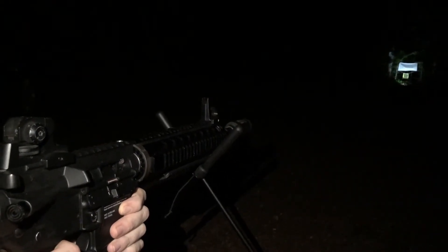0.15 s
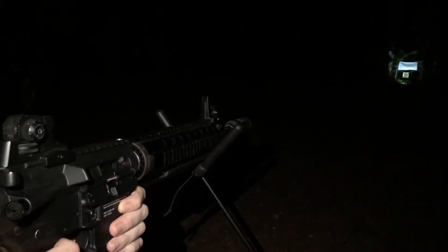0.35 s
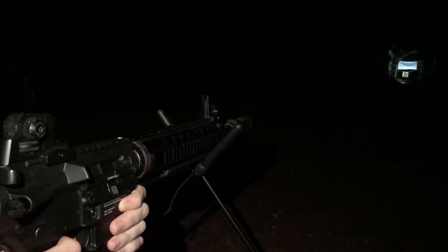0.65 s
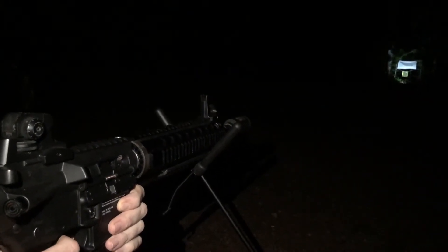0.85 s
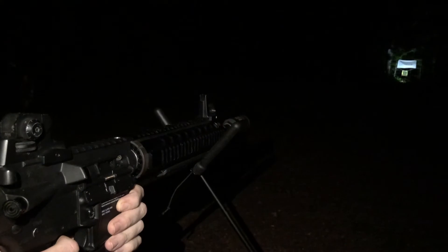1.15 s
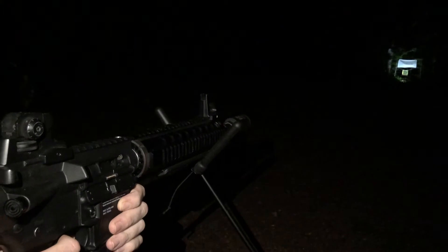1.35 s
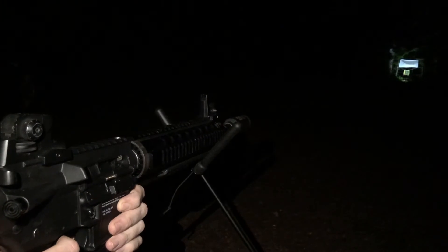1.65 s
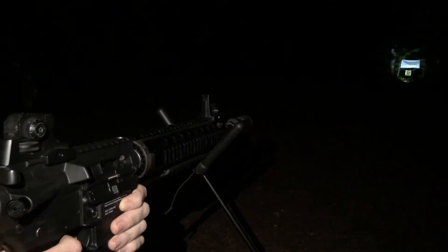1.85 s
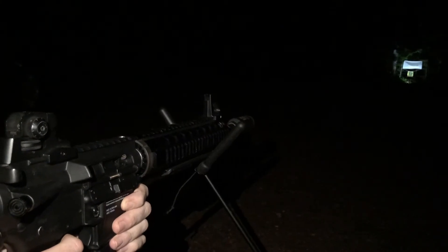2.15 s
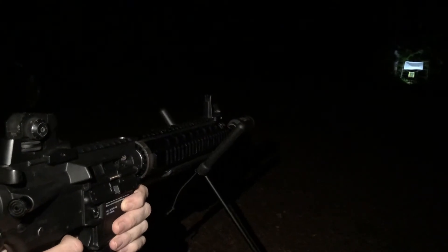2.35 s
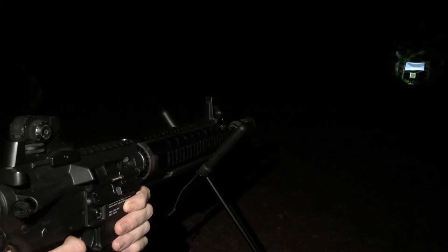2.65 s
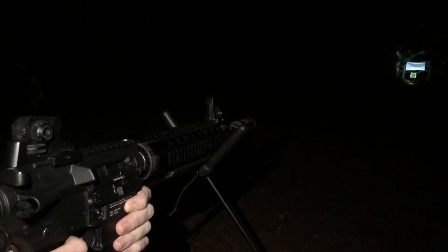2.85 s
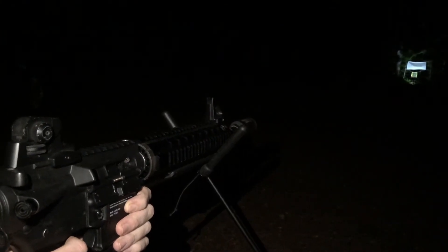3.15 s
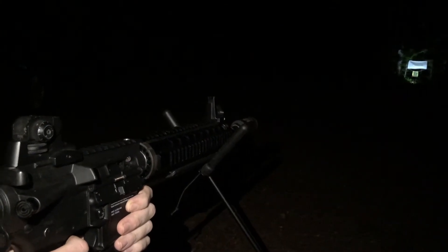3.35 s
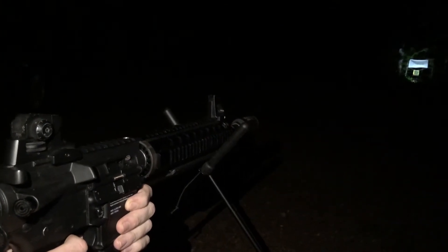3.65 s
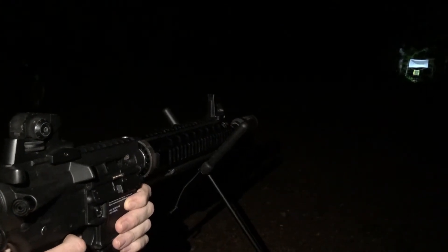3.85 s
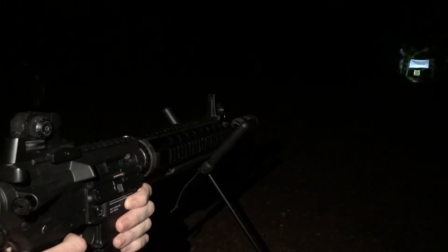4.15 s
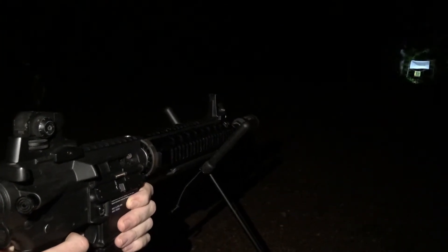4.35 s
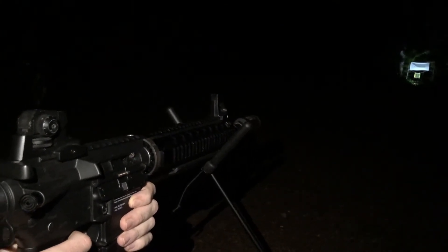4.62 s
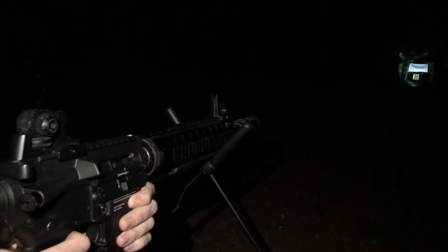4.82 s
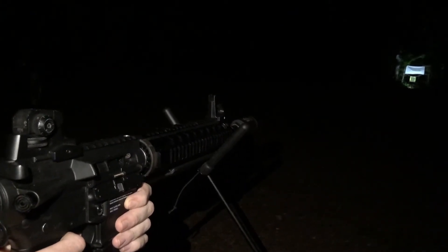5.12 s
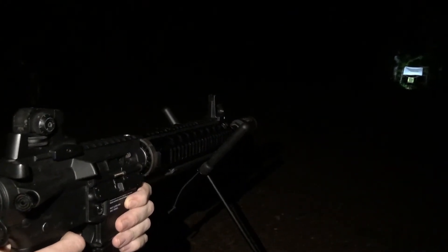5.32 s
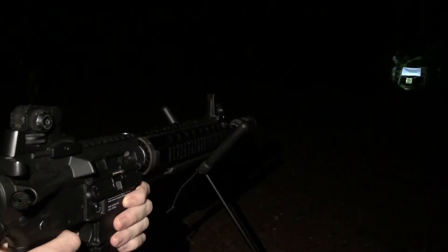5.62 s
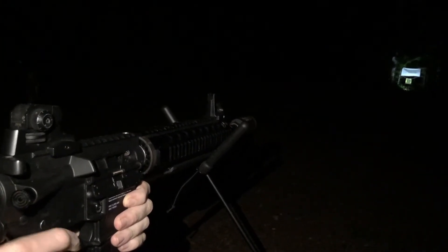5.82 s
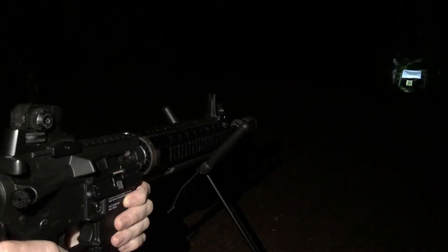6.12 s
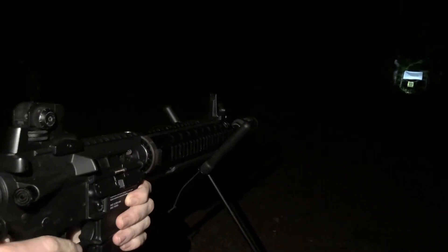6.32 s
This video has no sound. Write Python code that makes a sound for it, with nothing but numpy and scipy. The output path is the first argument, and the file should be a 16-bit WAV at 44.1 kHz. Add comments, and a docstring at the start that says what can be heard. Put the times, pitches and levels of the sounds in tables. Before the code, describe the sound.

At night outdoors, an earlier shot's echo fades, a mechanism clicks, then an airsoft rifle pops loudly close by, echoes off trees and clicks again.

```python
"""The echo of an earlier shot dies away over a soft hiss and low hum, outdoors at night; its pellet smacks a target.
Far crickets chirp (swelling noise), and a spring airsoft rifle fires close by at 4.8 s: sear, piston, slam, rebounds.
Each of these contacts is a bright noise burst plus the ringing modes of the body.
The pop is a filtered impulse, scattered back from the trees as fading noise, during which the pellet hits far away.
Small parts click, once before this shot and otherwise after it: noise bursts through resonances, with body knocks."""
import sys
import numpy as np
from scipy import signal
from scipy.fft import rfft, irfft, next_fast_len
from scipy.io import wavfile
from scipy.ndimage import uniform_filter1d, map_coordinates

SR = 44100
rng = np.random.default_rng(int(sys.argv[2]) if len(sys.argv) > 2 else 0)


def wav_out(sig):
    """Save sig, one row per channel (or a flat mono array), as 16-bit PCM at SR to the path in sys.argv[1]."""
    wavfile.write(sys.argv[1], SR, np.round(np.clip(np.atleast_2d(sig).T, -1, 1) * 32767).astype(np.int16))


N = 285768  # length of the scene in samples
T = np.arange(N) / SR  # time in seconds

# The shots. Each row: trigger time in seconds, strength of the pellet's hit in relative dB.
SHOTS = [(-.1525, -2), (4.8177, 0)]
# Bright spectrum of metal parts snapping together. Each row: frequency in Hz, relative level in dB per Hz.
SNAP_SPECTRUM = [(200, -15), (1000, -12.5), (2200, -7.5), (3200, 2.5), (4200, -6), (6500, 2), (9000, 0),
                 (10500, -3), (12500, -1.5), (16000, -8.5)]


def amp(db):
    """Turn decibels into a gain."""
    return 10 ** (np.asarray(db) / 20)


def unit(x):
    """Scale x to rms 1."""
    return x / np.sqrt(np.mean(np.abs(x) ** 2) + 1e-20)


def add(track, s, x):
    """Mix x into the track from time s in seconds; parts outside the track are cut off."""
    start = round(s * SR)
    x = x[max(-start, 0):N - start]
    track[max(start, 0):][:len(x)] += x


def filtered(x, response):
    """Multiply the spectrum of x by a complex response to frequency in Hz."""
    size = next_fast_len(len(x) + SR // 2)  # spare room, so that the end does not wrap round to the start
    spectrum = rfft(x, size) * response(np.fft.rfftfreq(size, 1 / SR))
    return irfft(spectrum, size)[:len(x)]


def colour(x, points):
    """Shape the spectrum of x through (Hz, dB) points with a filter of unit power that never sounds early."""
    size = 4096
    hz, db = np.transpose(points)
    log_hz = np.log(np.fft.rfftfreq(size, 1 / SR) + 1)
    gain = unit(amp(np.interp(log_hz, np.log(hz), db)))
    # Folding the cepstrum (spectrum of the log gain) forward in time gives the minimum-phase filter.
    cepstrum = irfft(np.log(gain))
    cepstrum[1:size // 2] *= 2
    cepstrum[size // 2 + 1:] = 0
    impulse_response = irfft(np.exp(rfft(cepstrum)))
    return signal.fftconvolve(x, impulse_response)[:len(x)]


def resonate(x, hz, width):
    """Pass x through one resonance of a given width in Hz, at unit power gain."""
    return filtered(x, lambda f: unit(1j * f * width / (hz * hz - f * f + 1j * f * width)))


def burst(t60):
    """One second of noise that falls 60 dB in t60 seconds; its energy is the same at every draw."""
    fade = amp(-60 * T[:SR] / t60)
    return unit(rng.standard_normal(SR) * fade) * np.sqrt(np.mean(fade ** 2))


def wobble(rate):
    """A smooth random curve through a given number of random points a second."""
    return map_coordinates(rng.standard_normal(int(N * rate / SR) + 4), [T * rate])


def patchy(x, depth_db):
    """Give x small random patches of gain in time and frequency, at rms 1."""
    z = signal.stft(x, nperseg=1024)[2]
    field = uniform_filter1d(rng.standard_normal(z.shape), size=3, axis=0)  # across frequency
    field = uniform_filter1d(field, size=9, axis=1)  # across time
    return unit(signal.istft(z * amp(depth_db * unit(field)), nperseg=1024)[1][:len(x)])


def tone(hz, width):
    """A tone of rms 1 whose wandering phase spreads it over a width in Hz."""
    drift = np.cumsum(rng.standard_normal(N)) * np.sqrt(2 * np.pi * abs(width) / SR)
    return np.sqrt(2) * np.sin(2 * np.pi * hz * T + drift)


def night(hiss_db=2, fizz_db=-13.0, fizz_swell=2, flutter_db=0.73):
    """A soft, fluttering hiss that brightens as it swells, a low rumble and faint steady tones."""
    # Slow course of the hiss. Each row: time in seconds, level in dB before the offsets hiss_db and fizz_db.
    air_level = [(0.0, -58.5), (1.12, -58), (1.16, -57.0), (1.92, -56), (2.28, -56.5), (2.4, -59),
                 (2.54, -54.5), (2.96, -55), (3.0, -56), (3.64, -55.5), (3.74, -59.0), (3.82, -55),
                 (4.18, -55.5), (4.22, -58.5), (4.54, -53.0), (4.76, -56), (5.56, -58.5), (5.64, -56),
                 (6.04, -56.5), (6.46, -52.5)]
    # Main part of the hiss. Each row: frequency in Hz, relative level in dB per Hz.
    hiss_spectrum = [(300, -11.5), (500, -6.5), (760, -6), (1000, -12.5), (1400, -5), (1650, -7), (2050, 1),
                     (2650, -2), (3100, 2.5), (3700, -1), (4500, 3), (5700, -1), (6900, -19), (9000, -30)]
    # Top treble of the hiss. Each row: frequency in Hz, relative level in dB per Hz.
    fizz_spectrum = [(5000, -36), (8500, -27), (11000, -3), (14000, 1), (15600, 7.5), (16000, -8)]
    # Low rumble. Each row: frequency in Hz, relative level in dB per Hz.
    rumble_spectrum = [(20, -41), (45, 0), (75, -12), (100, 2.5), (140, 0.5), (230, 0), (290, -8.5),
                       (380, -6), (500, -20), (1200, -34.5)]
    # Slow course of the rumble. Each row: time in seconds, level in dB.
    rumble_level = [(0, -63), (1.3, -60.5), (3.9, -58.5), (5.2, -61), (6.48, -59.5)]
    # Faint steady tones. Each row: frequency in Hz, width in Hz, rms level in dB.
    hum_tones = [(54, .1, -67), (110, 1.2, -81), (154.7, 2, -71.5), (221.3, 2.63, -73), (832, 7.8, -78.5),
                 (2441, 40.6, -67.5)]

    level = np.interp(T, *np.transpose(air_level)) + flutter_db * wobble(rate=16)
    hiss = amp(hiss_db + level) * colour(patchy(rng.standard_normal(N), depth_db=2), hiss_spectrum)
    # In dB, the top treble swings fizz_swell times as far as the rest of the hiss.
    fizz_level = fizz_db + level.mean() + fizz_swell * (level - level.mean())
    fizz = amp(fizz_level) * colour(rng.standard_normal(N), fizz_spectrum)
    rumble_gain = amp(np.interp(T, *np.transpose(rumble_level)))
    rumble = rumble_gain * colour(rng.standard_normal(N), rumble_spectrum)
    hum = sum(amp(db) * tone(hz, width) for hz, width, db in hum_tones)
    return hiss + fizz + rumble + hum


def trees(t):
    """Level in dB of the scatter: it builds up, weakens with distance and fades after the last trunks."""
    nearest_s, farthest_s = 0.088, 0.55  # round trips to the nearest and farthest trunks
    first_echo_db, spread_db_per_decade = -39, 14  # the second is the loss with distance
    build_db_per_s, fade_db_per_s = 102, 134  # before the nearest trunks, after the farthest
    spread = spread_db_per_decade * np.log10(np.clip(t, nearest_s, farthest_s) / nearest_s)
    build = build_db_per_s * np.maximum(nearest_s - t, 0)
    fade = fade_db_per_s * np.maximum(t - farthest_s, 0)
    return first_echo_db - spread - build - fade


def echoes(near_db=-29, near_t60=0.49, trunks_db=2):
    """Ground and brush answer at once; trunks and leaves scatter the pop for half a second."""
    # Answer of ground and brush. Each row: frequency in Hz, relative level in dB per Hz.
    near_spectrum = [(100, -8), (400, -5.5), (850, -3), (1300, -6), (1900, 0.5), (2600, -1.5), (5000, -1.5),
                     (7000, 0.5), (10000, -5.5), (16000, -7)]
    # Answer of the trees. Each row: frequency in Hz, relative level in dB per Hz.
    far_spectrum = [(200, -24), (700, -9), (1300, -6.5), (1900, 2), (2700, -6), (4000, -7.5), (5500, -1),
                    (6300, -1), (6900, 3.5), (8150, -8.5), (8700, -2), (9700, -10), (12500, -13),
                    (16000, -16)]

    near = amp(near_db) * colour(burst(near_t60), near_spectrum)
    scatter = colour(patchy(rng.standard_normal(SR), depth_db=2.5), far_spectrum)
    trunks = wobble(rate=170)[:SR]  # quick, uneven changes of level
    far = unit(scatter * amp(trunks_db * trunks)) * amp(trees(T[:SR]))
    return near, far


def muzzle(pop_db=3):
    """The air leaves the barrel as one hollow push: a filtered impulse."""
    # Spectrum of the pop. Each row: frequency in Hz, relative level in dB per Hz.
    pop_spectrum = [(40, -10), (110, -2), (210, -10.5), (340, 0.5), (520, -9.5), (750, -1), (1150, -4.5),
                    (1600, -12), (3200, -5.5), (6000, -11), (16000, -18.5)]
    return amp(pop_db) * colour(signal.unit_impulse(SR), pop_spectrum)


def pellet(hit_db=-11, rattle_db=-45, t60=0.05):
    """The pellet strikes the target in one hard smack, with a short rattle."""
    # Spectrum of the smack. Each row: frequency in Hz, relative level in dB per Hz.
    smack_spectrum = [(100, -13), (400, -4.5), (900, 0), (1600, -12), (2800, -1), (4800, 1.5), (7000, -1.5),
                      (8800, -4), (10500, -9), (13000, -8), (16000, -12)]
    contact = amp(hit_db) * signal.unit_impulse(SR) + amp(rattle_db) * burst(t60)
    return colour(contact, smack_spectrum)


def shots():
    """Each pop sounds with its echoes, and the pellet arrives while the trees still answer."""
    out = np.zeros(N)
    exit_s, arrival_s = .0218, .4603  # pop and pellet's hit, in seconds after the trigger
    for s, hit_db in SHOTS:
        near, far = echoes()
        add(out, s, far)
        add(out, s + exit_s, muzzle() + near)
        add(out, s + arrival_s, amp(hit_db) * pellet())
    return out


def ring(damping=0):
    """The rifle's body rings, each blow with new mode strengths; a hand adds damping in dB per second."""
    # Modes of receiver, barrel and spring.
    # Each row: frequency in Hz, typical relative level in dB, time to fall 60 dB undamped in seconds.
    body_modes = [(345, -2.5, 0.013), (516, -7.5, 0.046), (697, -4, 0.054), (832, -6.5, 0.17),
                  (1016, -2.5, 0.027), (1152, -4, 0.045), (1425, -0.5, 0.032), (1584, -22, 0.086),
                  (1947, -12.5, 0.18), (2940, -9, 0.071), (3440, -4.5, 0.044), (3830, -8.5, 0.077),
                  (5560, -17, .15), (7540, -17, .2)]
    t = T[:SR // 3]
    out = np.zeros(len(t))
    for hz, db, t60 in body_modes:
        level = db + rng.normal(0, 1.5) - (60 / t60 + damping) * t
        out += amp(level) * np.sin(2 * np.pi * (hz * t + rng.random()))
    return out


def rifle():
    """Sear, sliding piston, slam and rebounds: each snaps brightly and knocks the body."""
    # Contacts in one shot, in order: the sear, the piston's rush, its slam and the rebounds.
    # Each row: seconds after the trigger, snap in dB, knock in dB, time for the snap to fall 60 dB in seconds.
    action = [(-.002, -35, -47, 0.016), (.0003, -12.5, -41, 0.011), (0.0117, -18.5, -31.5, 0.05),
              (0.0159, -15.5, -33, 0.031), (0.0201, -15, -26, 0.011), (0.0226, -25, -23.5, 0.0066),
              (0.0283, -22, -40, 0.034), (.0335, -34, -52, 0.029), (.046, -51, -39, .05),
              (0.0882, -25.5, -64, 0.0087)]
    out = np.zeros(N)
    for trigger, _ in SHOTS:
        for s, snap_db, knock_db, t60 in action:
            add(out, trigger + s, amp(snap_db) * colour(burst(t60), SNAP_SPECTRUM))
            add(out, trigger + s, amp(knock_db) * ring())
    return out


def crickets(pitch_hz=2160, width=230, level_db=-6.5):
    """Distance smears each chirp into a soft swell of one narrow band of noise."""
    # Pairs of chirps. Each row: middle of the first chirp in seconds, level in dB before level_db is added.
    chirps = [(.54, -56.5), (1.56, -59), (2.47, -59), (3.34, -56.5), (4.38, -57), (5.63, -58)]
    gap_s, length_s = 0.2, 0.2  # from one chirp of a pair to the next; length of each
    swell = np.zeros(N)
    for s, db in chirps:
        for delay in (0, gap_s):
            swell += amp(db + level_db) * np.exp(-(2 * (T - s - delay) / length_s) ** 2)
    band = resonate(rng.standard_normal(N), pitch_hz, width)
    return swell * unit(resonate(band, pitch_hz, width))


def clicks(snap_t60=0.0044, crack_db=-4, rattle_db=-17, rattle_t60=0.033):
    """A small part snaps into place in two broad modes, rattles briefly and knocks the hand-damped body."""
    # Handling clicks of the mechanism. Each row: time in seconds, level in dB, lowest mode of the part in Hz,
    # upper mode in dB relative to the lowest, knock on the body in dB relative to the click's level.
    handling = [(0.8014, -15.5, 4900, -6, -25.5), (5.53, -42.5, 6900, -17, -40),
                (5.7216, -16.5, 4380, -9, -27), (5.9961, -38.5, 7800, -10, -40),
                (6.2573, -25.5, 6800, -10, -50), (6.2608, -22, 5570, 9.5, -48),
                (6.3724, -44, 8200, -10, -40)]
    out = np.zeros(N)
    width_hz = 1800
    for s, db, hz, upper_db, knock_db in handling:
        contact = burst(snap_t60) + amp(rattle_db) * burst(rattle_t60)
        low_mode = resonate(contact, hz, width_hz)
        high_mode = amp(upper_db) * resonate(contact, 2 * hz, 2 * width_hz)
        crack = amp(crack_db) * colour(burst(snap_t60), SNAP_SPECTRUM)
        add(out, s, amp(db) * (low_mode + high_mode + crack))
        add(out, s, amp(db + knock_db) * ring(damping=1600))
    return out


def scene():
    """Night, rifle and crickets together, in one channel."""
    return (night() + shots() + rifle() + crickets() + clicks())[None]


def record(dry):
    """The microphone delays each frequency by about a cycle, so bass trails; it cuts deep bass and top treble."""
    def response(hz):
        lag = np.exp(-2j * np.pi * np.log(hz + 5))
        low_cut = 1 - 1 / (1 + (hz / 40) ** 8)
        high_cut = 1 / (1 + (hz / 15900) ** 140)
        return lag * low_cut * high_cut
    return filtered(dry[0], response)[None]


dry = scene()
out = record(dry)
wav_out(out)
```